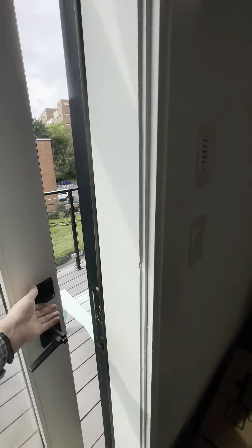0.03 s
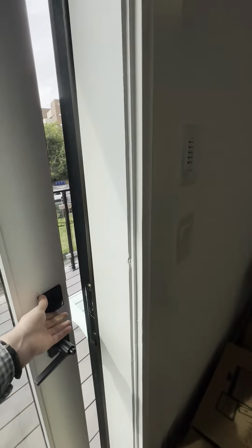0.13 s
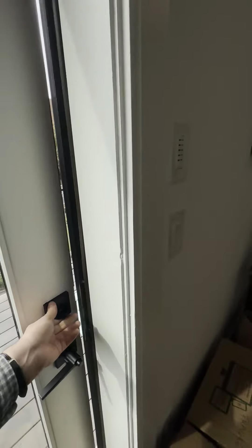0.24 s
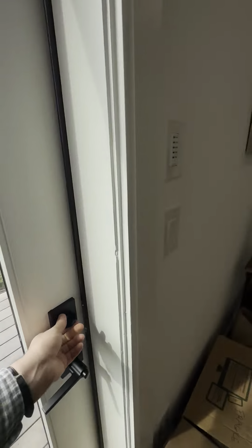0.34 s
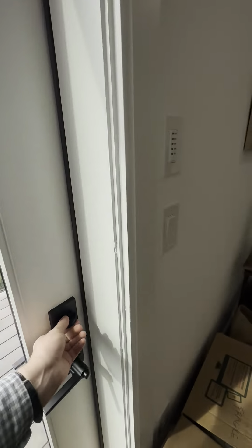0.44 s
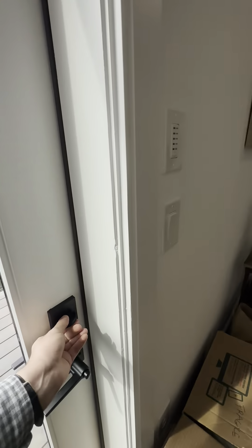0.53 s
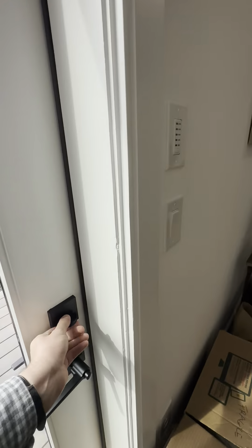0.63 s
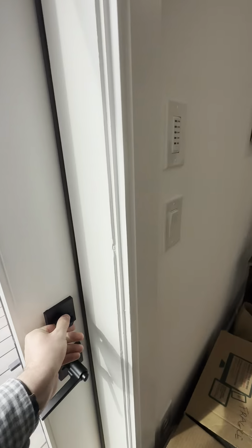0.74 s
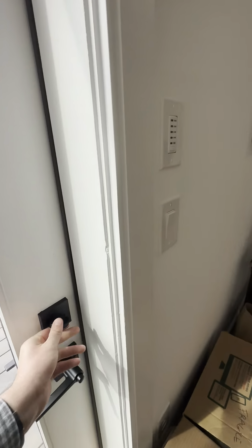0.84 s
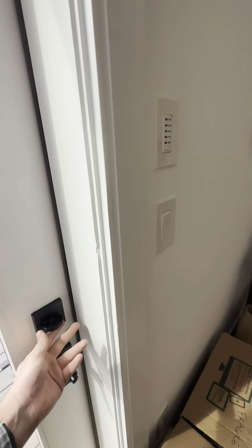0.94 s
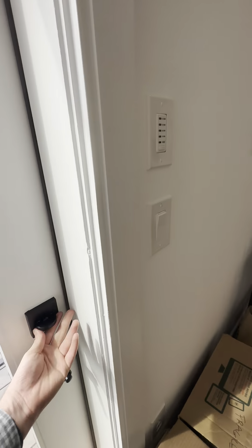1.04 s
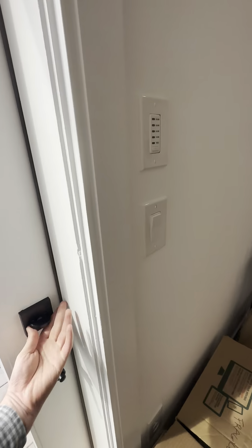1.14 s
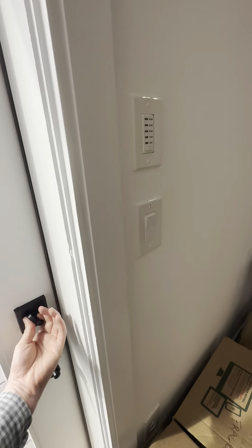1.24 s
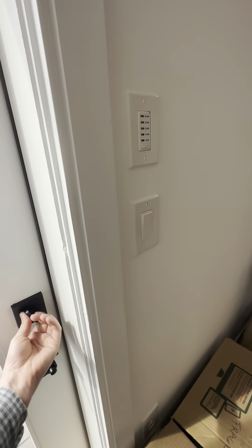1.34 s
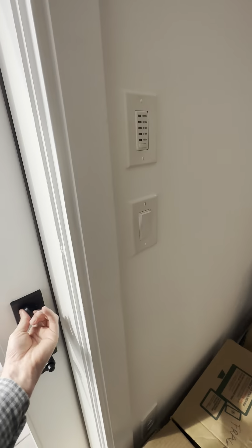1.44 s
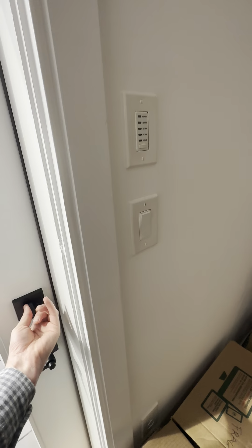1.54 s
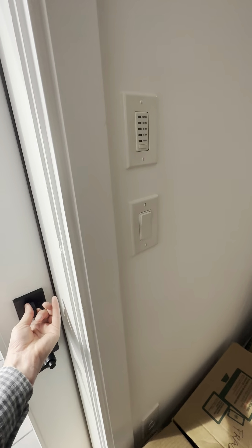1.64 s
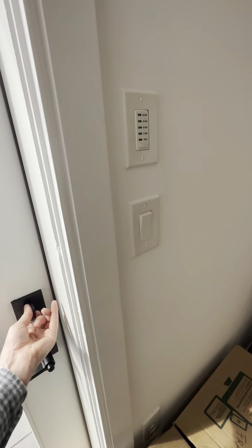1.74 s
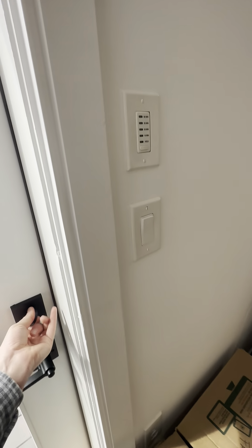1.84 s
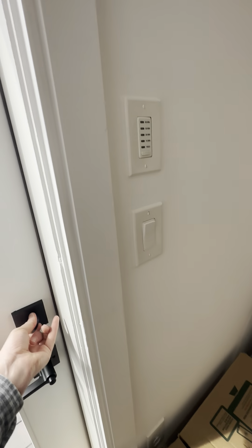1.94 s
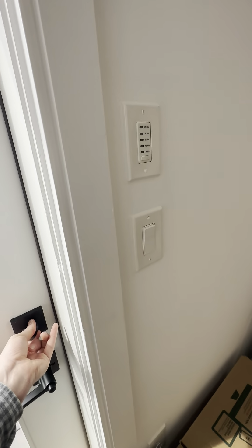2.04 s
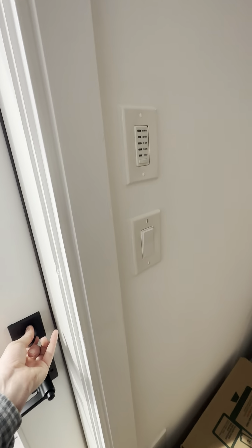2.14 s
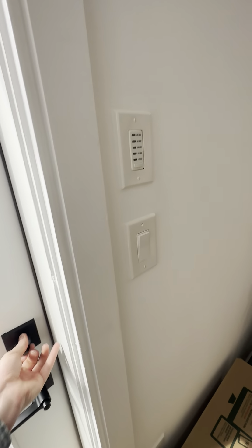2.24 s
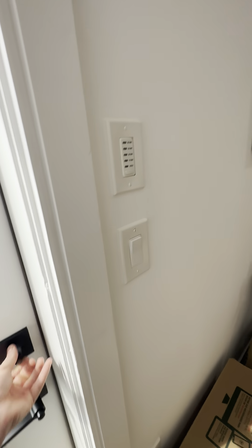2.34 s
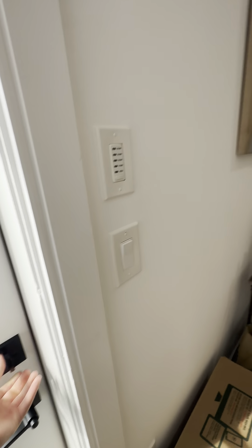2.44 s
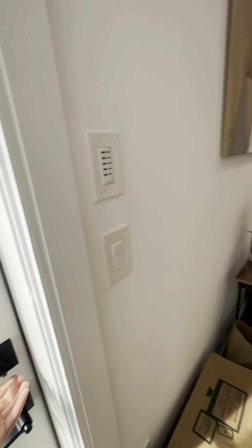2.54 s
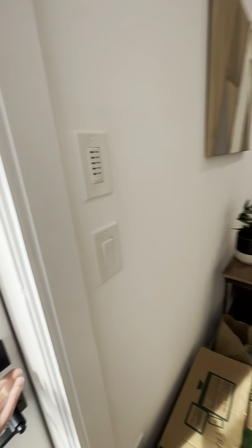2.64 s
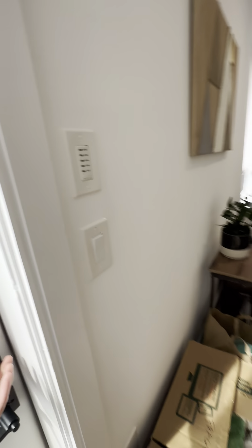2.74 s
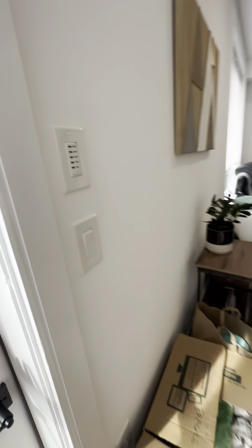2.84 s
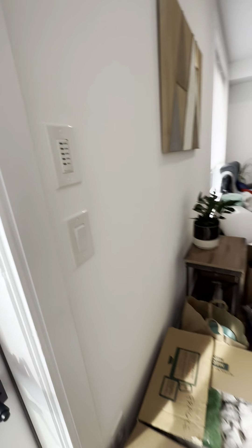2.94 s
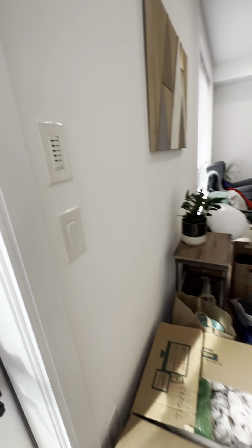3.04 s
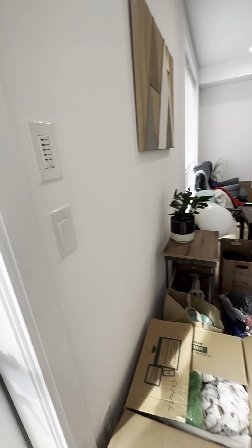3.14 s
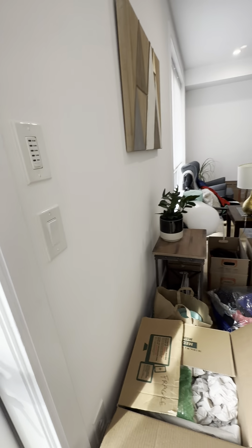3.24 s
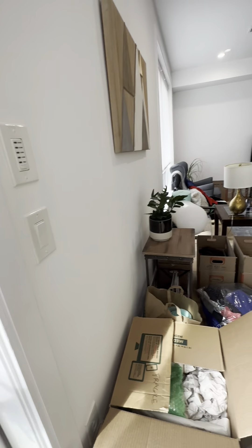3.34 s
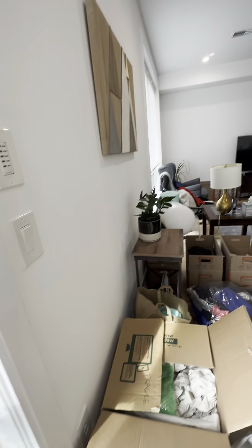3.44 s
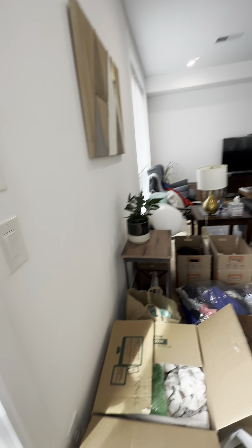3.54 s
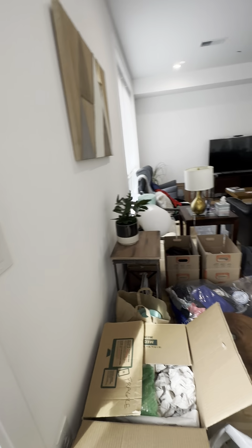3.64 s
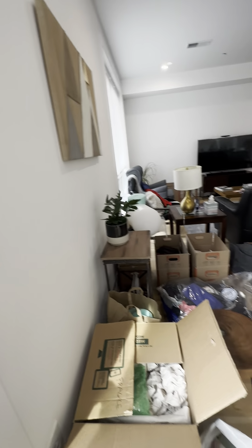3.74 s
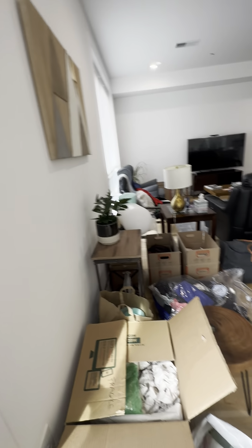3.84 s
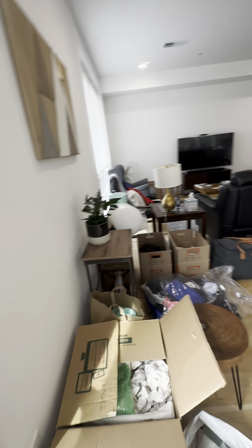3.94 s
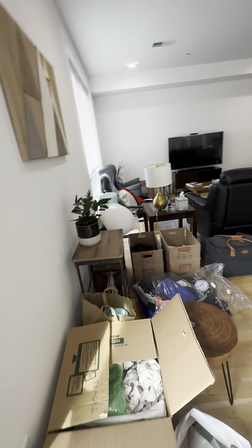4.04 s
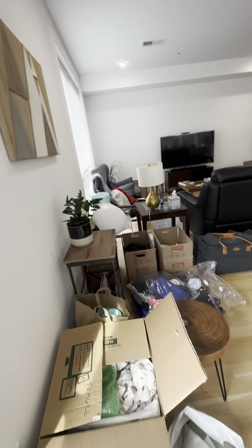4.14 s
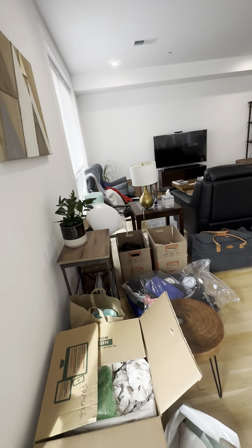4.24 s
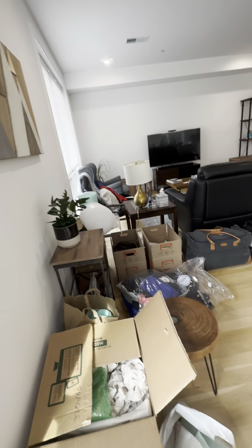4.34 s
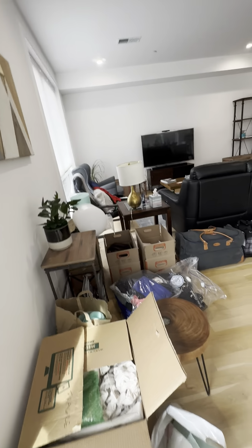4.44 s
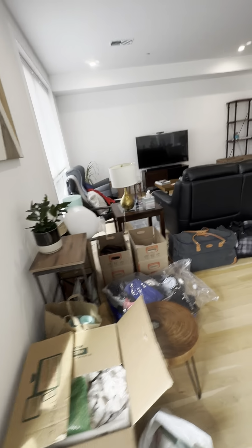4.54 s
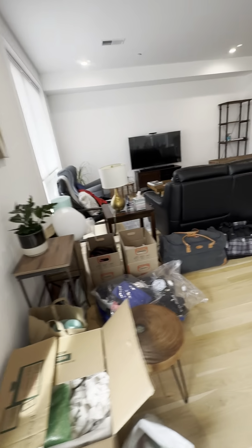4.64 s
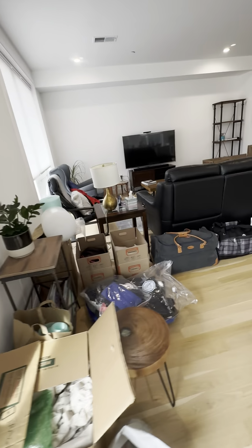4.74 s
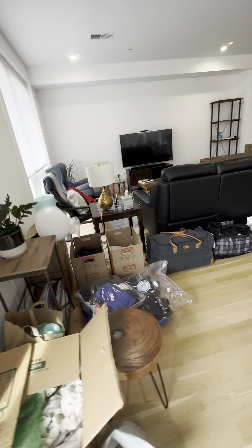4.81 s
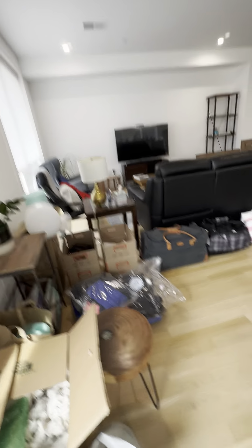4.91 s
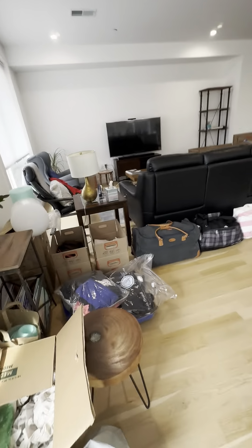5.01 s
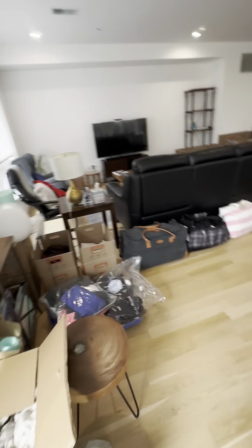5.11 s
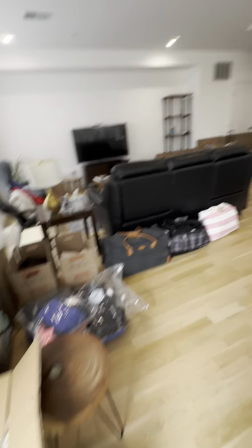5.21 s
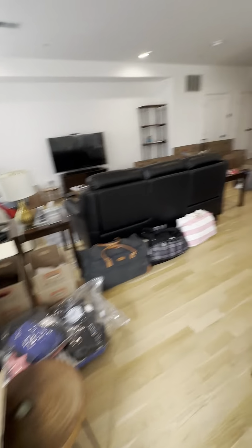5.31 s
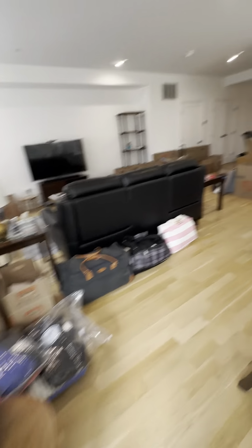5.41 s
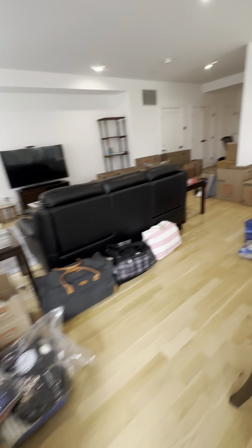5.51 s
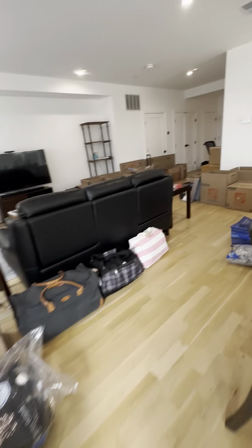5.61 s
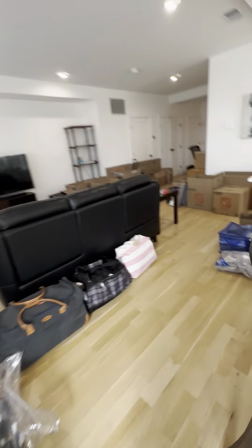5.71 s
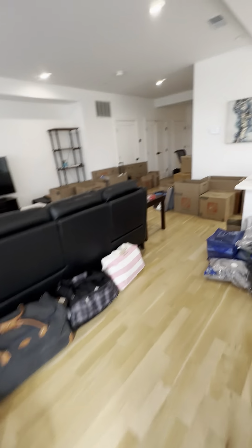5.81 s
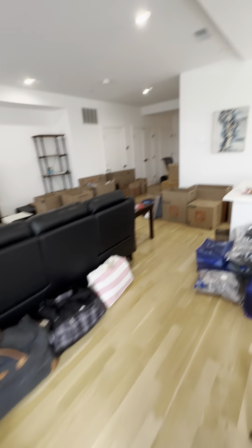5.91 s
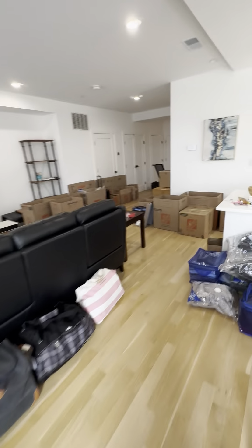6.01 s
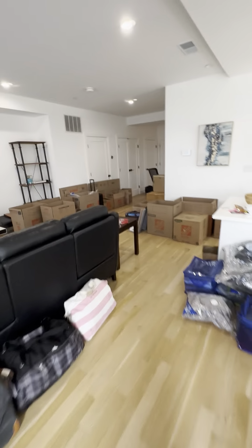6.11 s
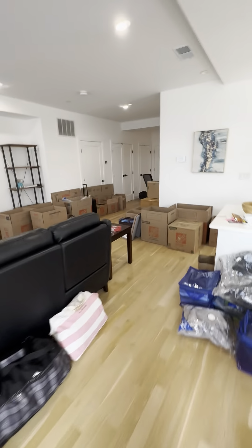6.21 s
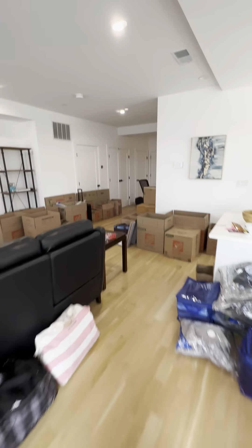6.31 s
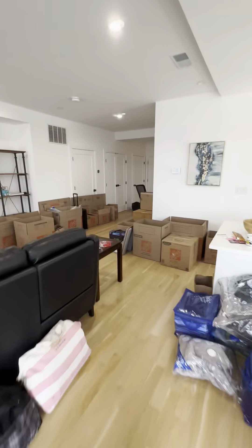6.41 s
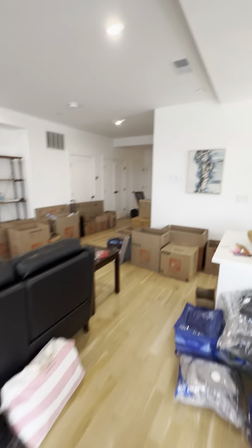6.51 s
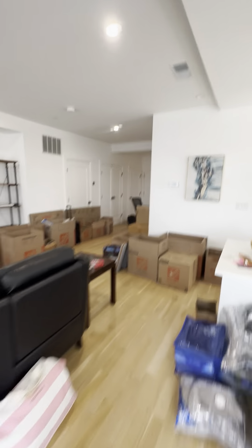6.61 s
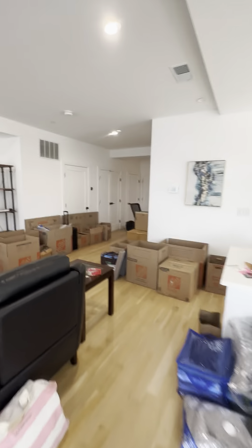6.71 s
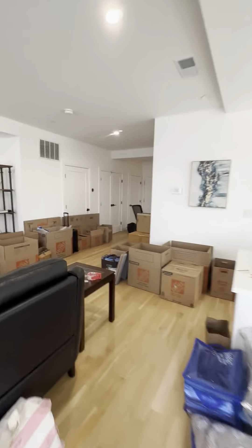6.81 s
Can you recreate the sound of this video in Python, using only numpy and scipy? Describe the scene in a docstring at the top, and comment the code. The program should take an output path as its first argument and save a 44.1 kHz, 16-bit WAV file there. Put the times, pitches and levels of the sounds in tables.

```python
"""A balcony door is pushed shut close to a phone: the latch hits the strike, the lever rattles, the latch drops in,
then a thumb turn throws the bolt. Noise clacks, metal modes and panel modes build each contact.
Shuffles, small clinks and a bright click follow as soft knocks and ticks in a bare, boxy living room.
Under it lie filtered noise for room air, hiss and hand, a swelling rumble around a sine hum, and swept bumps."""
import sys
import numpy as np
from scipy import signal
from scipy.fft import rfft, irfft, next_fast_len
from scipy.io import wavfile
from scipy.ndimage import uniform_filter1d, map_coordinates

SR = 44100
rng = np.random.default_rng(int(sys.argv[2]) if len(sys.argv) > 2 else 0)


def wav_out(sig):
    """Save sig, one row per channel (or a flat mono array), as 16-bit PCM at SR to the path in sys.argv[1]."""
    wavfile.write(sys.argv[1], SR, np.round(np.clip(np.atleast_2d(sig).T, -1, 1) * 32767).astype(np.int16))


N = 302567
T = np.arange(SR // 3) / SR  # time axis of one contact, in s

# Steady hiss spectrum: f/Hz, level/dB
HISS_COLOUR = [(530, -28), (900, -22), (1150, 3), (1580, 7), (2070, 2.5), (2600, -7.5), (2960, -8),
               (3380, -13), (4020, -6.5), (4990, -21.5), (6540, -6), (8580, -21.5), (10200, -78.5),
               (11100, -60), (12000, -61.5), (15600, -79.5), (22000, -120)]
# Room air spectrum: f/Hz, level/dB
AIR_COLOUR = [(100, 15.5), (200, 1.5), (330, 0.5), (520, -3.5), (650, -0.5), (830, -5), (1100, -12),
              (2000, -32.5), (4000, -19.5), (9000, -24.5)]
# Deep rumble spectrum: f/Hz, level/dB
DEEP_COLOUR = [(20, -33.5), (30, -17.5), (39, -5), (46, -5.5), (54, -2.5), (62, -8), (80, -23.5),
               (100, -37.5), (160, -36.5), (300, -129)]
# Slow level of the deep rumble: t/s, level/dB
DEEP_LEVEL = [(0, -32.5), (.2, -28.5), (.8, -29.5), (1.36, -29), (1.55, -23.5), (2.2, -23.5), (3.4, -27),
              (3.75, -32.5), (4.25, -23.5), (6.65, -23), (6.86, -24)]
# Swells and lulls of the rumble: crest t/s, rise/dB, time from the crest to about a third of the rise/s
SWELLS = [(.38, 12.5, 0.16), (.76, -6, 0.015), (1.153, 12, 0.12), (1.35, -11, 0.042), (2.86, 8.5, 0.065),
          (3.001, -12.5, 0.027), (3.45, 3, .05), (3.97, -9, 0.014), (4.68, 8, 0.046), (4.8, -9.5, 0.086),
          (4.98, 7.5, 0.15), (6.15, 7, 0.11), (6.5, 8.5, 0.092)]
# Low noise of the hand on the phone, spectrum: f/Hz, level/dB
HANDLING_COLOUR = [(50, 0), (85, 9.5), (105, 2.5), (150, -7.5), (200, -12), (300, -22.5), (600, -39),
                   (1500, -73)]
# Level of the hand's noise before its flutter: t/s, level/dB
GRIP_LEVEL = [(0, -54), (.33, -29), (.62, -33.5), (0.769, -45.5), (1.1, -30.5), (1.33, -42), (1.55, -35.5),
              (1.8, -41.5), (2.35, -34.5), (2.7, -44), (3.65, -39.5), (3.95, -41.5), (4.45, -39.5),
              (5.1, -31.5), (6.75, -34.5), (6.86, -44)]
# Bumps that travel through the phone's case: t/s, peak level/dB, starting f/Hz
BUMPS = [(1.018, -23.5, 550), (1.666, -29.5, 340), (4.017, -29.5, 344), (4.641, -31.5, 420),
         (5.162, -23.5, 389), (5.185, -25.5, 258), (5.276, -28, 296), (5.379, -17, 1130),
         (5.551, -21, 1066), (5.655, -26.5, 522), (5.724, -25, 280), (5.77, -29, 232), (5.982, -30, 327),
         (6.065, -25.5, 902), (6.241, -33.5, 1210), (6.281, -28.5, 380), (6.728, -25.5, 332),
         (6.758, -29, 302)]
# Fingers on the door, then sleeve scuffs and shuffling steps: t/s, knock level over 5 ms/dB, rise/s
SHUFFLES = [(0.048, -34, 0.0045), (1.011, -36.5, 0.0023), (1.122, -38, 0.0033), (2.378, -35.5, .001),
            (2.867, -47.5, .002), (3.17, -48, 0.0028), (3.29, -40.5, .005), (3.57, -41, .008),
            (3.704, -43, .002), (3.86, -45.5, .004), (4.508, -36.5, .003), (4.591, -31, .004),
            (4.626, -42, .008), (4.672, -41, 0.0077), (4.715, -42, 0.007), (5.618, -30.5, .014),
            (5.655, -36, 0.006), (5.703, -32.5, 0.013), (5.86, -42.5, .008), (6.004, -31.5, .003),
            (6.068, -32, .001), (6.118, -37.5, .003), (6.239, -27, 0.0015), (6.335, -38, .004),
            (6.477, -41.5, .008), (6.742, -39, 0.0065)]
# Soft knock spectrum: f/Hz, level/dB
KNOCK_COLOUR = [(120, -4), (250, -2.5), (420, -2.5), (640, -3), (860, -14), (1080, -17.5), (1500, -27),
                (3000, -45.5), (8000, -47.5)]
# Small hard things clicking: t/s, snap level over 5 ms/dB, f/Hz, ring level relative to the snap/dB
CLINKS = [(.868, -50, 1880, -8), (2.377, -51.5, 1160, 10), (2.867, -51, 2440, -12.5),
          (2.869, -49, 1100, -1), (3.3, -47.5, 1300, -9), (3.706, -42.5, 2210, -14),
          (4.589, -41.5, 2120, -8), (4.956, -53.5, 7100, -14)]
# Snap spectrum of a dry tick: f/multiple of the tick's pitch, level/dB
TICK_COLOUR = [(0.248, -15), (0.599, -2.5), (.85, -2), (0.997, 5.5), (1.35, -8.5), (2.599, -14.5),
               (5, -23.5)]
# Ringing modes of a dry tick: f/multiple of the tick's pitch, level/dB, t60/s
TICK_MODES = [(.83, -10.5, 0.035), (0.881, 5.5, 0.044), (0.999, 2, 0.021), (1.221, -8, 0.02),
              (1.36, -2.5, .02)]
# Bright metal click spectrum: f/Hz, level/dB
CLICK_COLOUR = [(300, 1.5), (550, -2), (950, -2), (1300, -8), (2600, -10.5), (3250, -2), (3550, 6.5),
                (4000, 5.5), (4450, -10), (5050, -2), (5700, -17), (7000, -10), (8500, -13), (10500, -25),
                (13000, -47)]
# Weather seal rubbing along the frame, level before its flutter: t/s, level/dB
SEAL_LEVEL = [(0, -46), (.15, -45), (0.272, -43), (0.333, -31.5), (0.387, -25.5), (.46, -42), (.56, -40),
              (0.699, -56)]
# Rubbing seal spectrum: f/Hz, level/dB
RUBBER_COLOUR = [(150, 10.5), (300, 4), (385, 4.5), (520, 0), (700, -28), (1100, -8.5), (1600, -23),
                 (5000, -27.5), (10000, -46)]
# Glass pane, strike plate (above 1 kHz) and floorboards (last three) ringing on:
# t/s, level over 5 ms/dB, f/Hz, t60/s
AFTER_RINGS = [(.316, -16, 380.7, 0.37), (.408, -19.5, 508, 0.14), (.607, -30, 1033, 0.31),
               (.607, -27.5, 1162, .3), (1.264, -26, 478, 0.49), (1.856, -25.5, 327.6, .22),
               (4.51, -40, 570, .07), (4.592, -29.5, 663, .06), (4.672, -37, 535, .12)]
# Contacts in the door: t/s, voice, clack level over 5 ms/dB, panel knock level over 5 ms/dB,
# clack t60/s, centre of the knock f/Hz. The row at 1.6603 s is a soft knuckle knock on the door,
# which borrows the cam's voice.
CONTACTS = [(0.2819, "latch", -24, -18.5, 0.082, 850), (0.291, "latch", -33, -28, .07, 500),
            (0.2977, "latch", -27, -18.5, 0.098, 523), (0.3113, "latch", -15, -18, .012, 394),
            (0.337, "latch", -37, -32.5, .04, 700), (.362, "latch", -45.5, -35.5, .04, 800),
            (0.395, "lever", -37, -28, 0.055, 403), (0.401, "lever", -31.5, -34, 0.078, 450),
            (0.4085, "lever", -21.5, -36, 0.057, 507), (0.4167, "lever", -31.5, -27, 0.075, 556),
            (.535, "lever", -48, -37.5, 0.015, 294), (0.6011, "keeper", -20.5, -20.5, 0.035, 296),
            (.606, "keeper", -19.5, -16, 0.045, 269), (0.651, "keeper", -38, -34, .04, 294),
            (0.689, "keeper", -45, -45, 0.024, 288), (1.2572, "thumb turn", -24, -23.5, 0.057, 358),
            (1.268, "thumb turn", -44, -20.5, 0.034, 400), (1.5106, "cam", -25, -36.5, 0.028, 300),
            (1.5137, "cam", -21, -28, 0.011, 403), (1.519, "cam", -30, -12, 0.031, 184),
            (1.566, "cam", -52, -41, 0.04, 623), (1.6603, "cam", -39.5, -32, 0.039, 500),
            (1.8513, "bolt", -24, -48, 0.024, 330), (1.8553, "bolt", -15, -20, 0.0079, 380),
            (1.8623, "bolt", -27.5, -18, 0.079, 330), (1.881, "bolt", -40, -37, 0.043, 700),
            (1.896, "bolt", -44.5, -38.5, 0.034, 850)]
# Door panel modes before each knock favours its own centre: f/Hz, level/dB, t60/s
PANEL_MODES = [(161, -3, 0.084), (189, 4.5, 0.04), (234, 1.5, 0.057), (280, 2.5, 0.06), (313, -2.5, 0.079),
               (397, 1.5, 0.06), (440, 0.5, 0.073), (498, -0.5, 0.043), (620, -8, 0.056),
               (835, -2.5, 0.095)]
# The door leaf's dense wooden sound, spectrum: f/Hz, level/dB
LEAF_COLOUR = [(130, -21), (290, -2.5), (470, 9), (620, -2), (800, 1), (1100, -10), (1500, -19),
               (4000, -46.5)]
# Latch clack spectrum: f/Hz, level/dB
LATCH_COLOUR = [(300, -13.5), (600, 3.5), (850, -8), (1100, 6.5), (1500, -8.5), (2000, 2.5), (2800, -13.5),
                (3900, -11.5), (5200, -21.5), (6200, -13), (7500, -21.5), (9500, -29.5), (11500, -39),
                (13000, -71)]
# Lever clack spectrum: f/Hz, level/dB
LEVER_COLOUR = [(300, -6), (600, 5.5), (800, -15), (1100, -7), (1500, -12.5), (2100, -7.5), (2800, -16),
                (3900, -14), (5200, -19.5), (7500, -21.5), (9500, -26.5), (11500, -33), (13000, -75)]
# Keeper clack spectrum: f/Hz, level/dB
KEEPER_COLOUR = [(300, 0), (520, -5), (780, -11), (980, 4.5), (1140, 8.5), (1330, -3), (2000, -7.5),
                 (2700, -7), (3700, -12), (4600, -6), (5400, -21), (7500, -17.5), (9500, -25.5),
                 (11500, -31), (13000, -63)]
# Thumb turn clack spectrum: f/Hz, level/dB
THUMB_COLOUR = [(300, -0.5), (470, 14), (620, -2), (850, -7), (1100, 1.5), (1500, -2.5), (2000, 4),
                (2800, -8.5), (3900, -11), (4800, -10), (5900, -20), (7500, -15), (9500, -35), (11500, -40),
                (13000, -75)]
# Cam clack spectrum, also used by the knuckle knock: f/Hz, level/dB
CAM_COLOUR = [(300, -12.5), (600, 5), (770, 0.5), (1020, 3.5), (1400, -2.5), (2000, 2), (2600, -2),
              (3900, -7), (5200, -10), (7500, -15), (9500, -25), (11500, -23), (13000, -50)]
# Bolt clack spectrum: f/Hz, level/dB
BOLT_COLOUR = [(300, 0), (600, -8), (800, -8), (1100, -3), (1500, -3.5), (2000, -1.5), (2800, -9),
               (4000, -4), (5200, -13), (7500, -13), (9500, -27), (11500, -22.5), (13000, -64)]
# Latch metal modes: f/Hz, width before mounting loss/Hz, level/dB
LATCH_MODES = [(837, 30, 3), (1166, 79, 4), (1200, 230, 15.5), (1860, 184, 20.5), (2980, 67, 4.5),
               (6460, 100, -5.5)]
# Lever metal modes: f/Hz, width before mounting loss/Hz, level/dB
LEVER_MODES = [(500, 17, -15), (2120, 260, -3.5), (3600, 32, -18.5), (4680, 120, -17), (6580, 97, -53),
               (7550, 58, -32)]
# Keeper metal modes: f/Hz, width before mounting loss/Hz, level/dB
KEEPER_MODES = [(974, 53, 2.5), (1068, 40, 6), (2500, 220, -13.5), (3700, 150, 5.5), (5550, 160, 4.5),
                (7400, 120, 8)]
# Thumb turn metal modes: f/Hz, width before mounting loss/Hz, level/dB
THUMB_MODES = [(1760, 130, 1.5), (3390, 67, -12.5), (7850, 99, -10)]
# Cam metal modes, also used by the knuckle knock: f/Hz, width before mounting loss/Hz, level/dB
CAM_MODES = [(510, 40, 7.5), (712, 51, 1), (1013, 25, 7.5), (1880, 180, -11), (2550, 450, -19),
             (3250, 140, -3), (7730, 70, 9)]
# Bolt metal modes: f/Hz, width before mounting loss/Hz, level/dB
BOLT_MODES = [(570, 39, -6.5), (770, 7.3, 1.5), (1000, 13, 3.5), (1990, 350, 12), (2640, 180, 4),
              (3800, 130, 17.5), (4660, 82, 6), (8000, 90, 6)]
# Decay of the room's tail: f/Hz, t60/s
ROOM_DECAY = [(150, 0.59), (400, 0.45), (1100, 0.63), (2000, 0.54), (4500, 0.62), (8000, 0.57),
              (12000, 0.13)]
# Likeness of the phone's two ports, which oppose each other in the low middle: f/Hz, left-right likeness
PORT_LIKENESS = [(100, .6), (180, .1), (300, -.75), (720, -.8), (1000, .05), (2000, .35), (4000, .15),
                 (8000, .1)]
# Balance of the ports: f/Hz, left minus right level/dB
PORT_LEAN = [(100, 0), (250, -21.5), (400, -8), (600, -1.5), (1200, -5.5), (3000, 3.5), (8000, -1.5)]

HUM_HZ, HUM_DB, HUM_WANDER_RAD = 54.35, 1.5, 0.34  # pitch, level over the deep noise, phase drift
BUMP_END_HZ, BUMP_SWEEP_S, BUMP_LENGTH_S = 135.2, 0.00246, 0.0082
BUMP_LAG_S = 0.00024  # how much later a bump reaches the right port
TICK_DB, TICK_HZ = -25, 1430  # snap of a shuffle's tick relative to its knock, and its pitch
NEIGHBOUR_SPREAD, NEIGHBOUR_DB = 0.0558, -8.5  # offset of neighbour modes as a share of pitch, their level
CLACK_RISE_S = 0.00062  # metal faces meet over a short time
GRAIN_HZ, GRAIN_DB = 420, 2.5  # how quickly and how deeply they chatter as they meet
LEAF_RISE_S, LEAF_T60_S = 0.0036, 0.29
MOUNTING_LOSS = .04  # hand and mounting widen each metal mode by this share of its pitch
PORT_MISMATCH_DB = 0.56  # the left port is a little more sensitive than the right
TOP_HZ = 15800  # the phone's band limit


def amp(db):
    """Decibels to gain."""
    return 10 ** (np.asarray(db) / 20)


def unit(x):
    """Scale to rms 1."""
    return x / np.sqrt(np.mean(x ** 2) + 1e-20)


def brief(x):
    """Scale each channel to the energy of 5 ms at rms 1."""
    energy = np.sum(x ** 2, axis=-1, keepdims=True)
    return x * np.sqrt(.005 * SR / (energy + 1e-20))


def along(points, hz):
    """Read (f/Hz, value) points on a log frequency axis."""
    f, value = np.transpose(points)
    return np.interp(np.log(hz + 1), np.log(f + 1), value)


def wobble(rate, size=N):
    """A smooth random curve with rate knots a second."""
    knots = rng.standard_normal(int(size * rate / SR) + 4)
    return map_coordinates(knots, [np.arange(size) * rate / SR])


def rise(rise_s):
    """An onset that closes in on full level exponentially."""
    return 1 - np.exp(-T / rise_s)


def filtered(x, response):
    """Filter x by a zero-phase response of frequency."""
    size = next_fast_len(N + SR // 2)
    hz = np.fft.rfftfreq(size, 1 / SR)
    return irfft(rfft(x, size) * response(hz), size)[..., :N]


def noise(colour, channels=1):
    """Steady noise of rms 1 with the given spectrum."""
    white = rng.standard_normal((channels, N))
    return unit(filtered(white, lambda hz: amp(along(colour, hz))))


def struck(x, colour, size=16384):
    """Colour a short sound with a minimum-phase filter, so that its attack stays sharp."""
    gain = amp(along(colour, np.fft.rfftfreq(size, 1 / SR)))
    cepstrum = irfft(np.log(gain))
    # Folding the cepstrum forward in time makes the filter causal.
    cepstrum[1:size // 2] *= 2
    cepstrum[size // 2 + 1:] = 0
    return irfft(rfft(x, size) * np.exp(rfft(cepstrum)), size)[..., :len(T)]


def burst(t60, size=260):
    """A dying stereo noise burst with its energy spread evenly over frequency."""
    spectrum = rfft(rng.standard_normal((2, len(T))) * amp(-60 * T / max(t60, .002)))
    power = uniform_filter1d(np.abs(spectrum) ** 2, size, axis=1)
    even = irfft(spectrum / np.sqrt(np.abs(power) + 1e-12), len(T))
    return even * (T < T[-1] / 2)


def ring(modes, scatter_db):
    """Decaying (f/Hz, level/dB, t60/s) modes, scattered in level, a quarter cycle apart at the ports."""
    hz, db, t60 = np.transpose(modes)[:, :, None]
    strength_db = db + scatter_db * rng.standard_normal(db.shape)
    phase = 2 * np.pi * (hz * T + rng.random(hz.shape))
    wave = np.sum(amp(strength_db - 60 * T / t60) * np.exp(1j * phase), axis=0)
    return np.array([wave.real, wave.imag])


def add(track, s, x):
    """Mix x into the track at s seconds."""
    part = track[:, round(s * SR):][:, :len(T)]
    part += x[..., :part.shape[1]]


def in_room(x, wet_db, near_db, near_t60):
    """Add the quick, sparse echoes of the door recess and the room's longer tail."""
    hz, t, spectrum = signal.stft(rng.standard_normal((2, SR * 3 // 4)), SR, nperseg=256)
    decay = amp(-60 * t / along(ROOM_DECAY, hz)[:, None])
    tail = signal.istft(spectrum * decay, SR, nperseg=256)[1]
    t = np.arange(tail.shape[1]) / SR
    tail *= 1 - np.exp(-t / 0.0046)
    # Cubing the noise leaves a few strong echoes.
    near = rng.standard_normal(tail.shape) ** 3 * amp(-60 * t / near_t60) * (t > .002)
    tail *= amp(wet_db) / np.linalg.norm(tail, axis=1, keepdims=True)
    near *= amp(near_db) / np.linalg.norm(near, axis=1, keepdims=True)
    return x + signal.fftconvolve(x, tail + near, axes=1)[:, :N]


def hiss():
    """Faint steady hiss: filtered noise, mostly shared by the two ports."""
    shared = amp(-54.0) * noise(HISS_COLOUR)
    separate = amp(-71.5) * noise(HISS_COLOUR, channels=2)
    return shared + separate


def room_air():
    """Steady room air: low-weighted noise, drawn separately for each side."""
    return amp(-46.5) * noise(AIR_COLOUR, channels=2)


def rumble():
    """Deep noise around a motor hum of wavering phase; its level swells and lulls."""
    t = np.arange(N) / SR
    hum = np.sqrt(2) * np.sin(2 * np.pi * HUM_HZ * t + HUM_WANDER_RAD * wobble(5))
    deep = unit(amp(HUM_DB) * hum + noise(DEEP_COLOUR)[0])
    # Even out the noise's own slow level so that the drawn curve shapes it.
    deep /= np.sqrt(np.abs(uniform_filter1d(deep ** 2, size=SR // 4)) + 0.02)
    slow_db = np.interp(t, *np.transpose(DEEP_LEVEL))
    swell_db = sum(db * np.exp(-((t - s) / width_s) ** 2) for s, db, width_s in SWELLS)
    return amp(slow_db + swell_db) * deep


def handling(flutter_db):
    """The hand's low noise on the phone, following the grip level with an uneven flutter."""
    grip_db = np.interp(np.arange(N) / SR, *np.transpose(GRIP_LEVEL))
    return amp(grip_db + flutter_db * wobble(14)) * noise(HANDLING_COLOUR)


def bumps():
    """Bending waves bring their treble first, so each bump sweeps down; the right port hears it later."""
    track = np.zeros((2, N))
    age = T / BUMP_SWEEP_S
    swell = age ** 1.35 * np.exp(-(T / BUMP_LENGTH_S) ** 2)
    swell /= swell.max()
    lag_s = np.array([[0], [BUMP_LAG_S]])
    for s, db, start_hz in BUMPS:
        pitch_hz = BUMP_END_HZ + (start_hz - BUMP_END_HZ) * np.exp(-age)
        cycles = np.cumsum(pitch_hz) / SR - pitch_hz * lag_s
        add(track, s, amp(db) * swell * np.sin(2 * np.pi * cycles))
    return track


def tick(hz, ring_db):
    """A dry noise snap with a brief ring of modes, both scaled to one pitch."""
    colour = [(ratio * hz, db) for ratio, db in TICK_COLOUR]
    modes = [(ratio * hz, db, t60) for ratio, db, t60 in TICK_MODES]
    snap = brief(struck(burst(t60=0.0052), colour))
    return snap + amp(ring_db) * brief(ring(modes, scatter_db=4.0))


def shuffles():
    """Soft contacts are a dull knock with a small tick on top; hard little things only tick."""
    track = np.zeros((2, N))
    for s, db, hz, ring_db in CLINKS:
        add(track, s, amp(db) * tick(hz, ring_db))
    for s, db, rise_s in SHUFFLES:
        knock = brief(struck(burst(t60=0.062) * rise(rise_s), KNOCK_COLOUR))
        top = amp(TICK_DB) * tick(TICK_HZ, ring_db=-3.5)
        add(track, s, amp(db) * (knock + top))
    return in_room(track, wet_db=-8.0, near_db=-6.0, near_t60=0.064)


def click():
    """A short, bright metal click: one coloured noise burst that the room answers."""
    track = np.zeros((2, N))
    snap = brief(struck(burst(t60=.035) * rise(CLACK_RISE_S), CLICK_COLOUR))
    add(track, 4.893, amp(-37) * snap)
    return in_room(track, wet_db=-9.5, near_db=-9, near_t60=.06)


def seal():
    """The weather seal rubs along the frame as the door is pressed home: fluttering, coloured noise."""
    s, db = np.transpose(SEAL_LEVEL)
    level_db = np.interp(np.arange(N) / SR, s, db, right=-120)
    return amp(level_db + 2.1 * wobble(90)) * noise(RUBBER_COLOUR, channels=2)


def after_rings():
    """After a blow one mode rings on, beating against a weaker neighbour on each side."""
    track = np.zeros((2, N))
    for s, db, hz, t60 in AFTER_RINGS:
        modes = [(hz * (1 + NEIGHBOUR_SPREAD * side), NEIGHBOUR_DB * abs(side), t60) for side in (-1, 0, 1)]
        add(track, s, amp(db) * brief(ring(modes, scatter_db=2.0) * rise(.004)))
    return track


def leaf_rattle():
    """The door leaf's many close modes, as coloured noise, build up and die away."""
    return brief(struck(burst(LEAF_T60_S) * rise(LEAF_RISE_S), LEAF_COLOUR))


def door_part(voice, colour, modes, ring_db, leaf_db, wet_db):
    """Each contact clacks, rings its metal modes, knocks the panel around one pitch and rattles the leaf."""
    metal = []
    for hz, width_hz, db in modes:
        t60 = np.log(1000) / (np.pi * (width_hz + MOUNTING_LOSS * hz))
        metal.append((hz, db, t60))
    body, hardware = np.zeros((2, 2, N))
    for s, name, clack_db, knock_db, clack_t60, centre_hz in CONTACTS:
        if name != voice:
            continue
        # Panel modes weaken by 17 dB per octave away from the knock's centre.
        panel = [(hz, db - 17 * abs(np.log2(hz / centre_hz)), t60) for hz, db, t60 in PANEL_MODES]
        grain = amp(GRAIN_DB * wobble(GRAIN_HZ, size=len(T)))
        clack = brief(struck(burst(clack_t60) * grain * rise(CLACK_RISE_S), colour))
        knock = brief(ring(panel, scatter_db=1.0) * rise(0.0037))
        metal_ring = brief(ring(metal, scatter_db=0.0) * rise(0.00076))
        add(body, s, amp(clack_db) * clack)
        add(body, s, amp(knock_db + leaf_db) * leaf_rattle())
        add(body, s, amp(knock_db) * knock)
        add(hardware, s, amp(clack_db + ring_db) * metal_ring)
    # Clack, panel and leaf fill the room; the metal modes are heard only directly.
    return in_room(body, wet_db, near_db=-9, near_t60=0.045) + hardware


def door():
    """Latch on strike, lever let go, latch into keeper, thumb turn, cam on bolt, knuckle knock, bolt home."""
    # The knuckle knock sounds through the cam's voice.
    return (door_part("latch", LATCH_COLOUR, LATCH_MODES, ring_db=4.0, leaf_db=0, wet_db=-17.0)
            + door_part("lever", LEVER_COLOUR, LEVER_MODES, ring_db=1.5, leaf_db=-0.5, wet_db=-11.5)
            + door_part("keeper", KEEPER_COLOUR, KEEPER_MODES, ring_db=-4.0, leaf_db=-11.5, wet_db=-10.5)
            + door_part("thumb turn", THUMB_COLOUR, THUMB_MODES, ring_db=5.0, leaf_db=-20, wet_db=-11.0)
            + door_part("cam", CAM_COLOUR, CAM_MODES, ring_db=0, leaf_db=-15.0, wet_db=-11)
            + door_part("bolt", BOLT_COLOUR, BOLT_MODES, ring_db=0.0, leaf_db=-4, wet_db=-14.0))


def ports(x):
    """Airborne sound at the two ports: blend the sides to a set likeness, then tilt their balance."""
    def alike(hz):
        return np.clip(along(PORT_LIKENESS, hz), -.99, .99)

    def unlike(hz):
        return np.sqrt(1 - alike(hz) ** 2)

    def balance(hz):
        lean = amp(along(PORT_LEAN, hz))
        return np.array([lean, np.ones_like(hz)]) / np.sqrt((1 + lean ** 2) / 2)

    left, right = x
    left = filtered(right, alike) + filtered(left, unlike)
    return filtered(np.array([left, right]), balance)


def scene():
    """Door, shuffles and air pass the ports; rumble, hand, bumps and hiss are added directly."""
    airborne = room_air() + shuffles() + click() + seal() + after_rings() + door()
    return hiss() + rumble() + handling(flutter_db=3.5) + bumps() + ports(airborne)


def record(dry):
    """Peaks are rounded, the lowest bass is cut, a steep low-pass near 11 kHz darkens the top; left leads."""
    ceiling = .76
    rounded = dry / (1 + np.abs(dry / ceiling) ** 6) ** (1 / 6)
    colour = [(22, -8.5), (38, 0.5), (10000, -1.5), (11200, -11.0), (12400, -37.5)]  # f/Hz, level/dB
    mismatch = amp(PORT_MISMATCH_DB * np.array([[.5], [-.5]]))
    return mismatch * filtered(rounded, lambda hz: amp(along(colour, hz)) * (hz < TOP_HZ))


dry = scene()
out = record(dry)
wav_out(out)
```